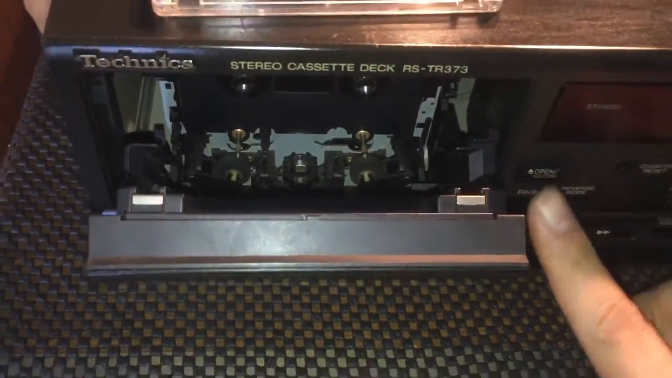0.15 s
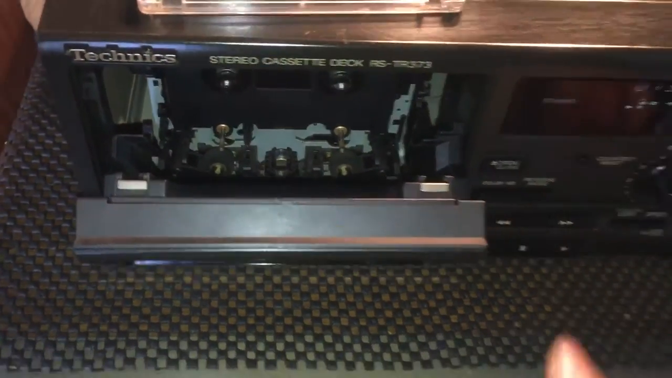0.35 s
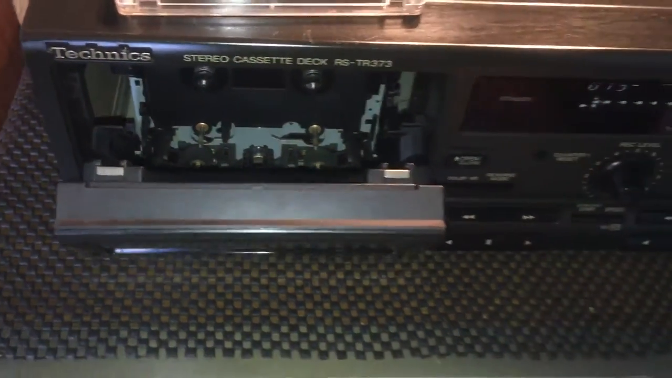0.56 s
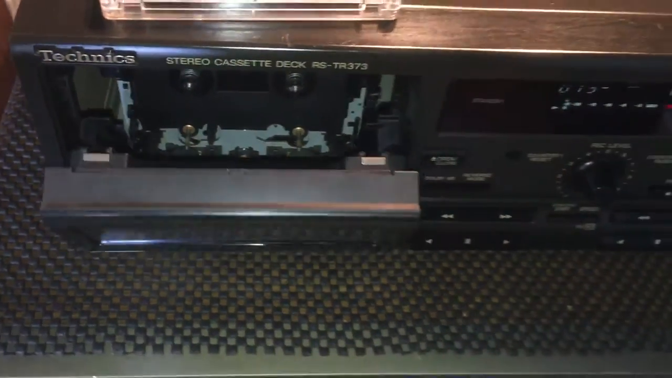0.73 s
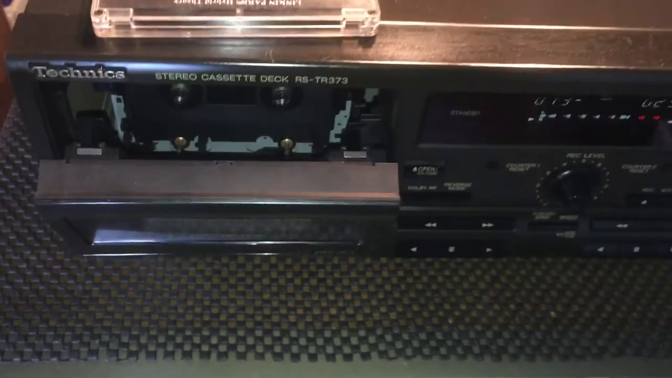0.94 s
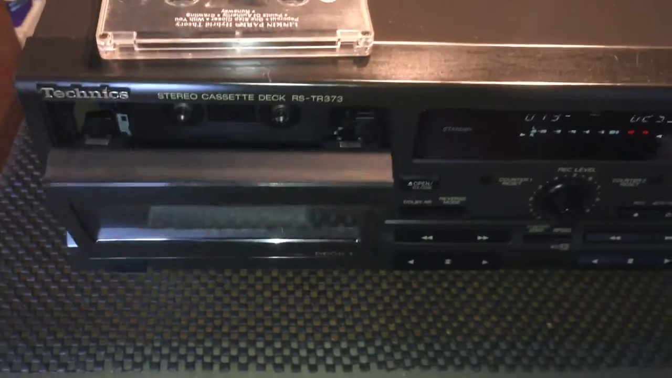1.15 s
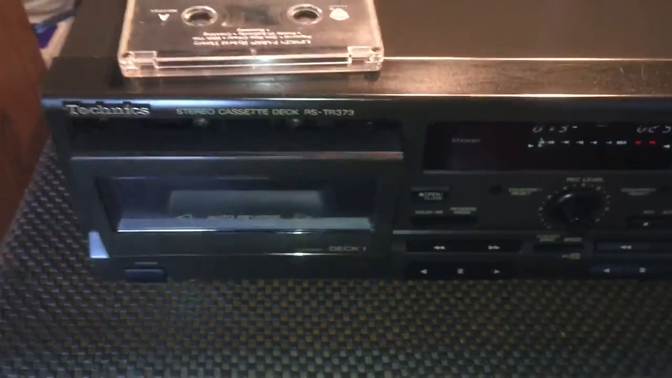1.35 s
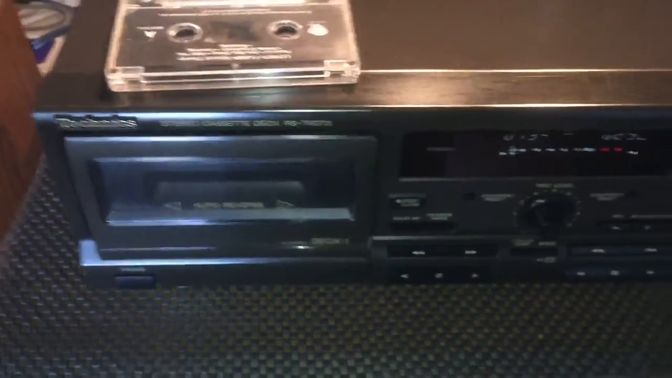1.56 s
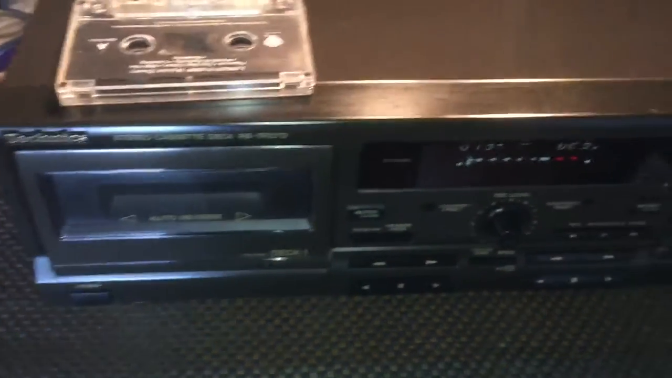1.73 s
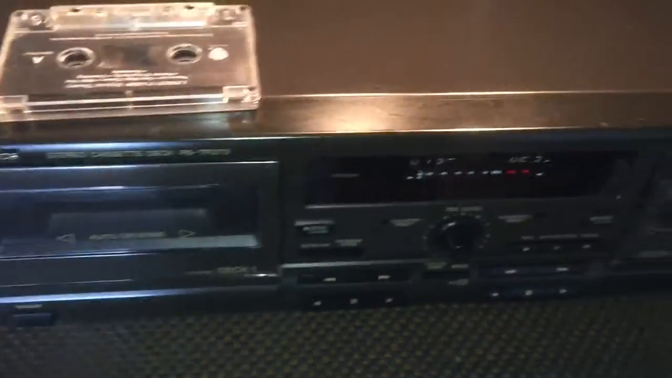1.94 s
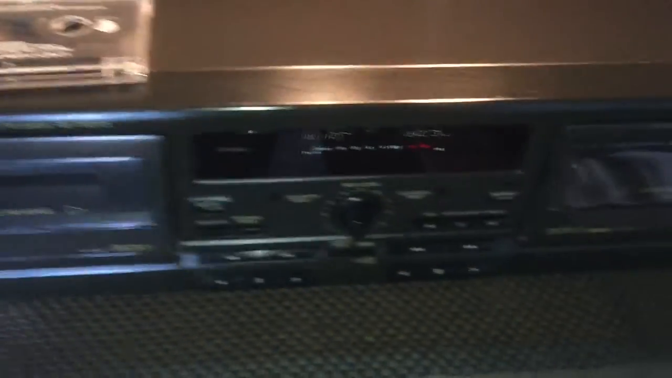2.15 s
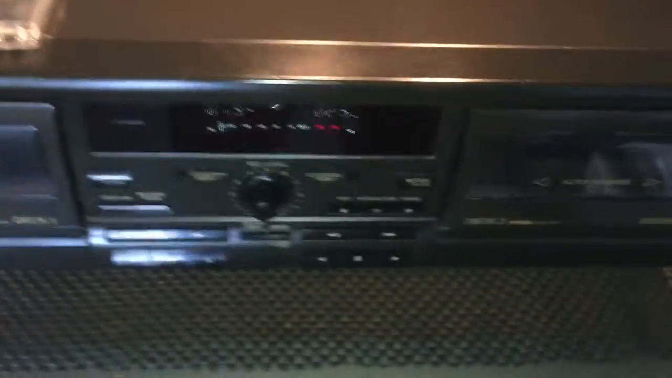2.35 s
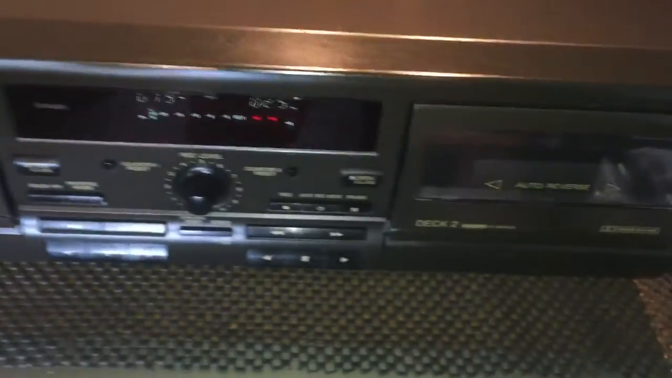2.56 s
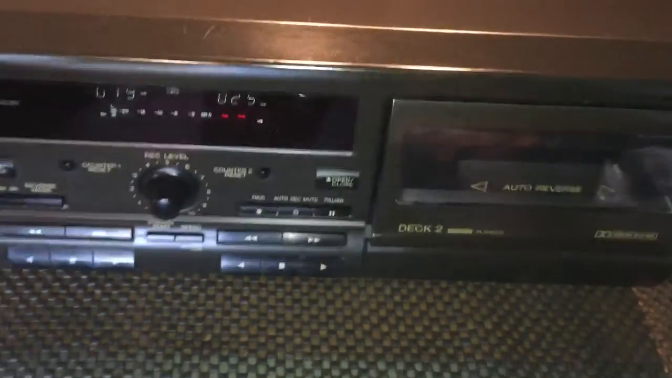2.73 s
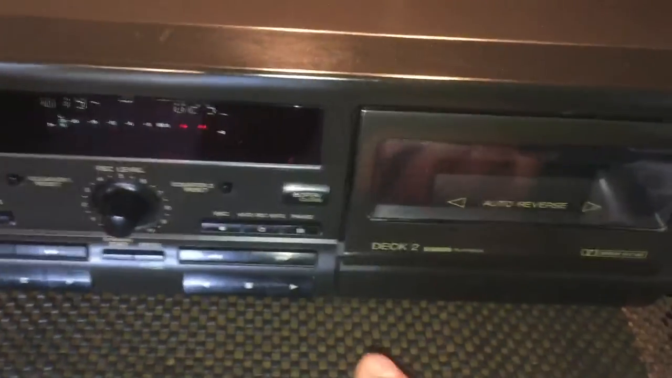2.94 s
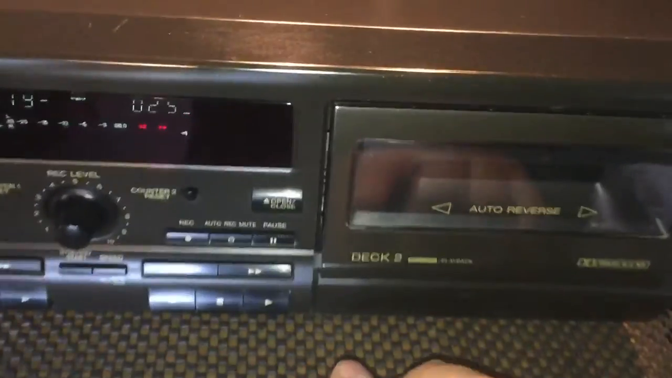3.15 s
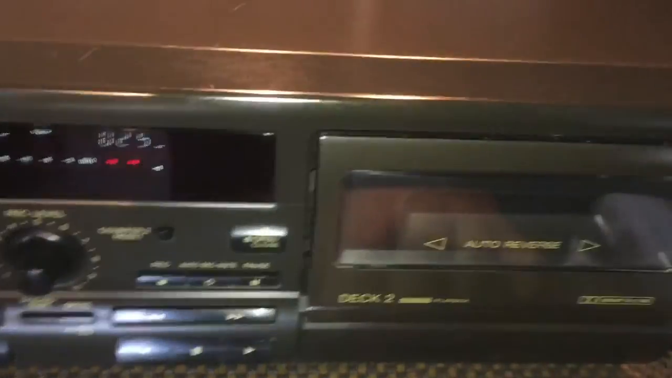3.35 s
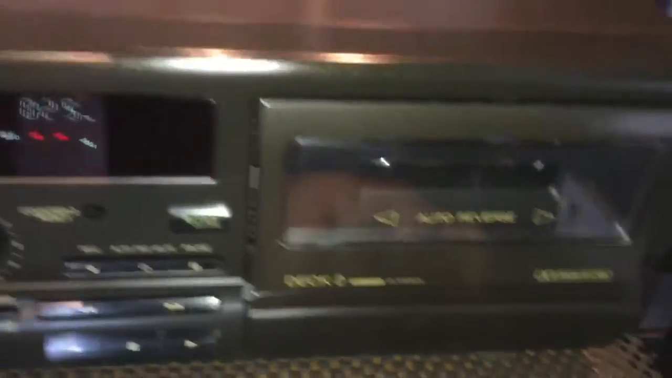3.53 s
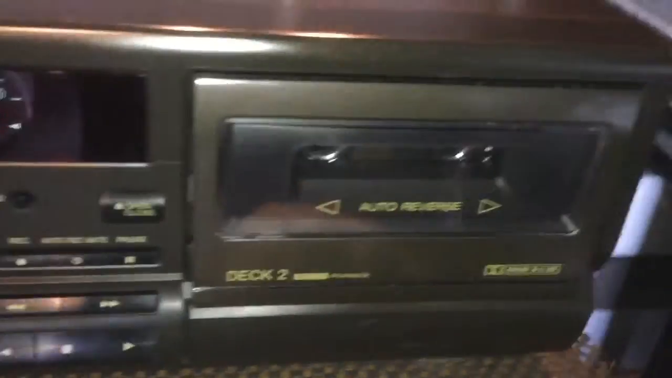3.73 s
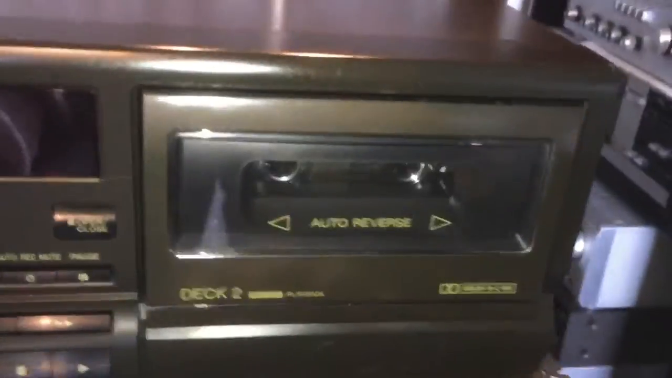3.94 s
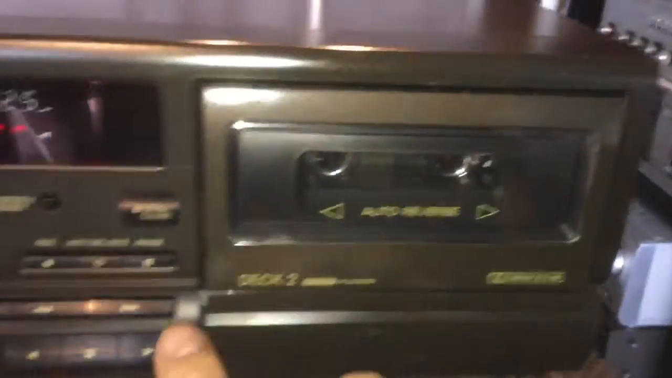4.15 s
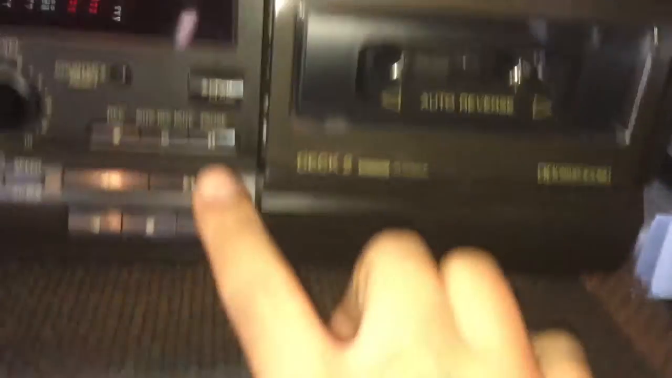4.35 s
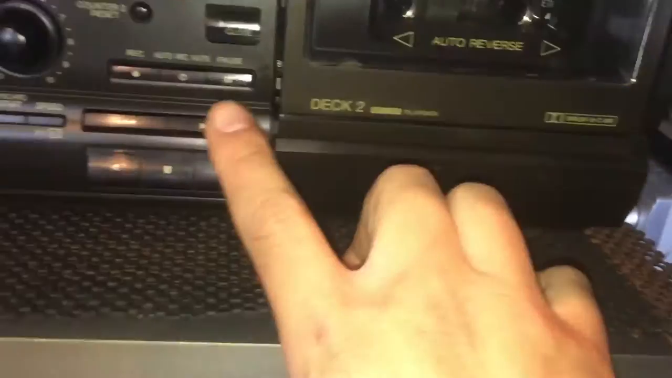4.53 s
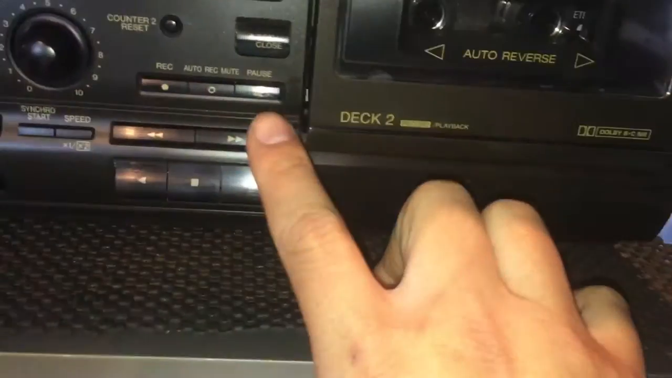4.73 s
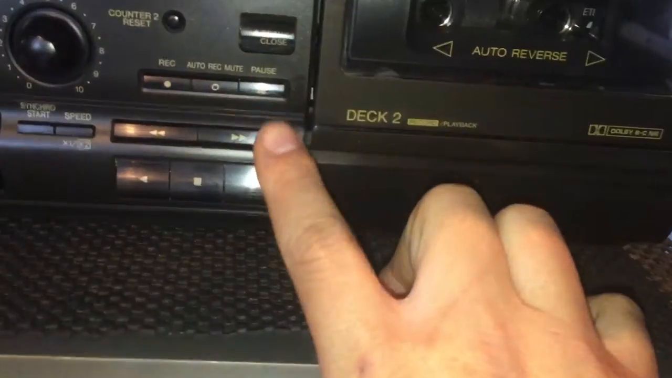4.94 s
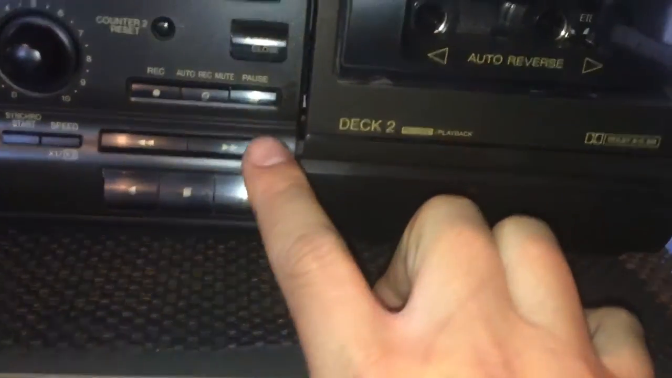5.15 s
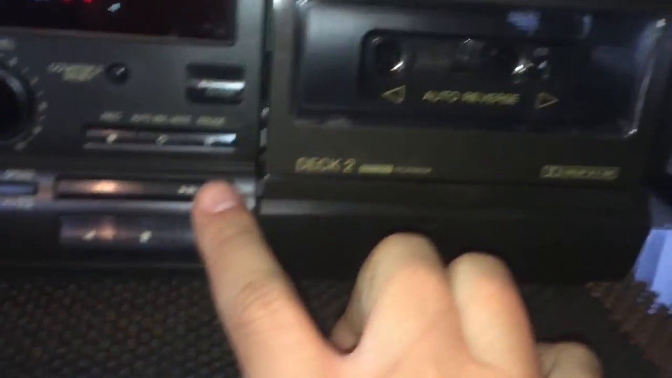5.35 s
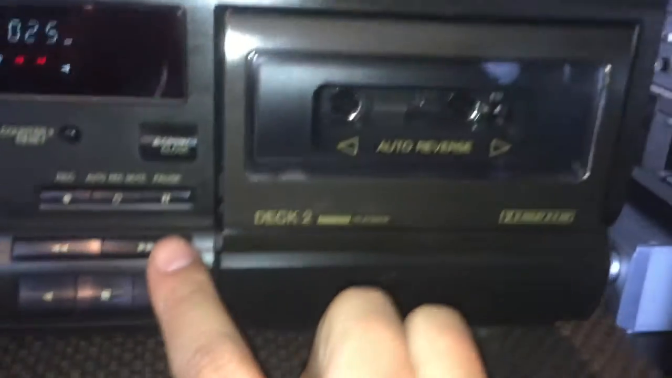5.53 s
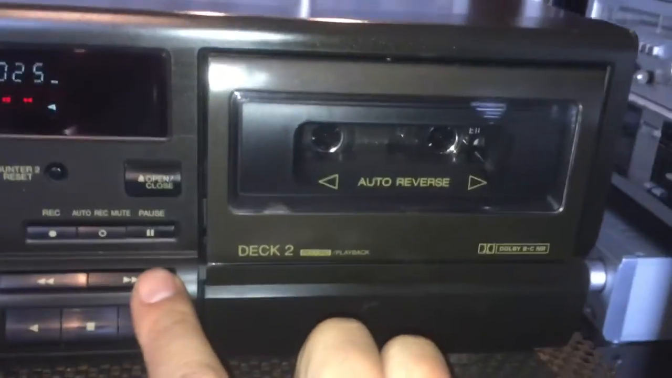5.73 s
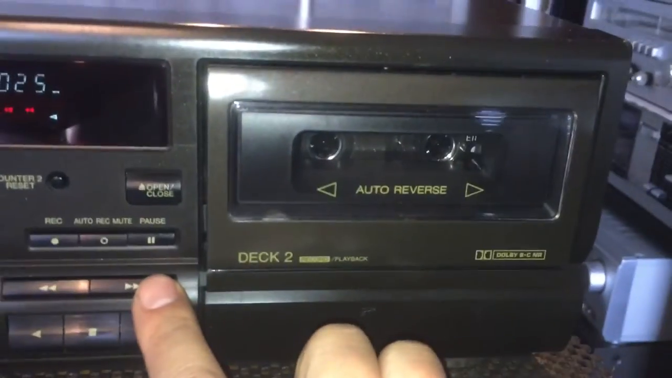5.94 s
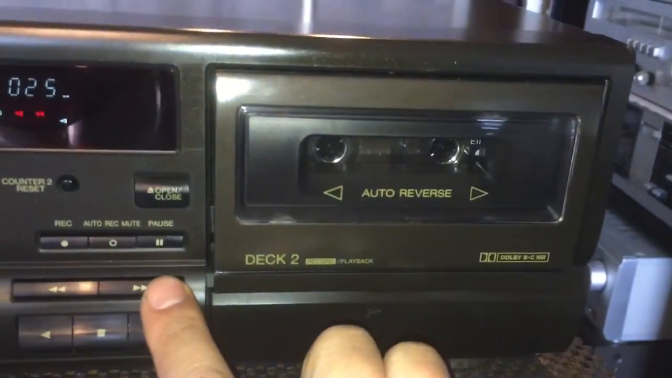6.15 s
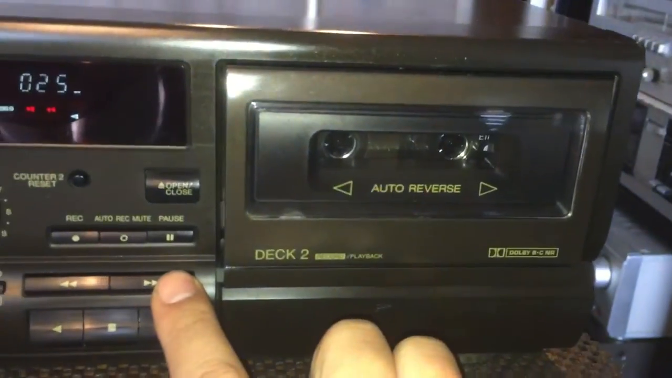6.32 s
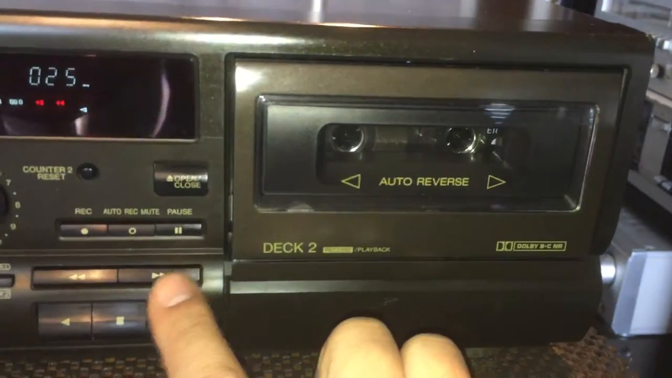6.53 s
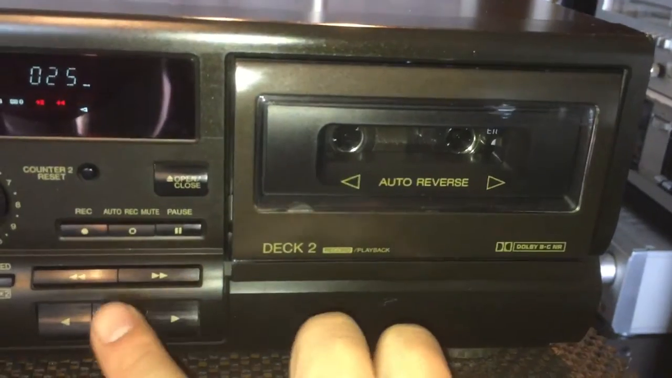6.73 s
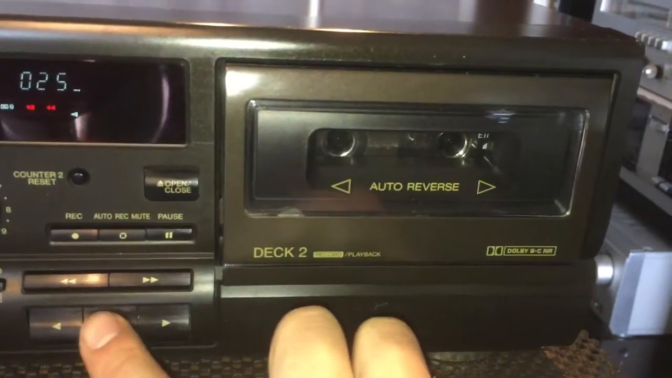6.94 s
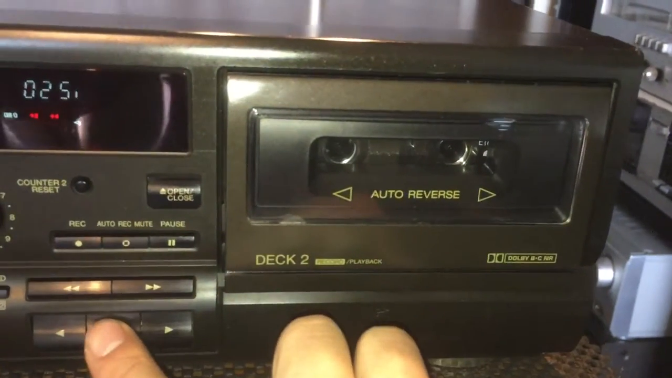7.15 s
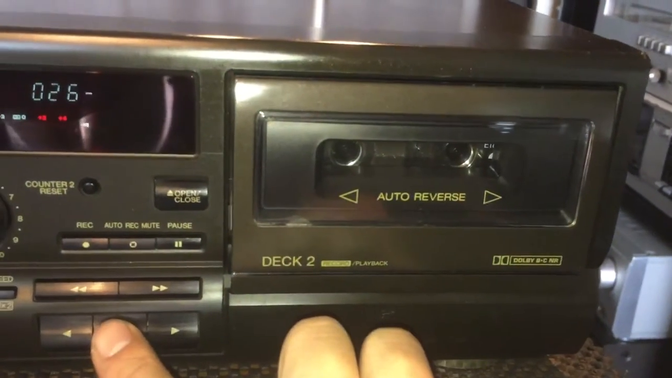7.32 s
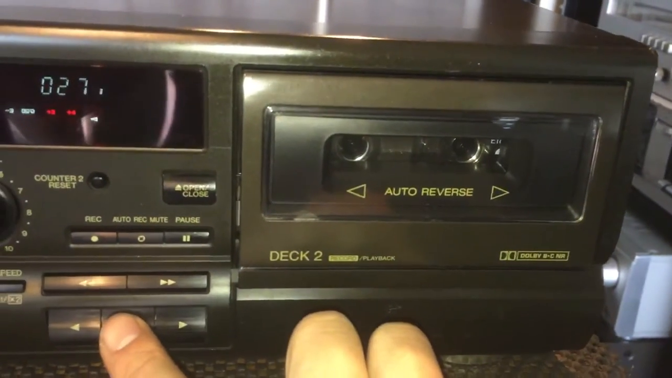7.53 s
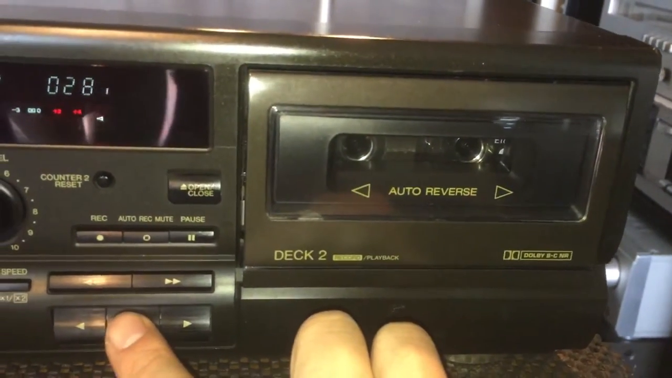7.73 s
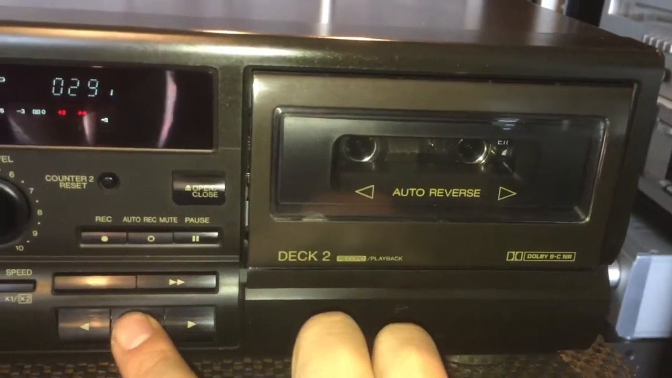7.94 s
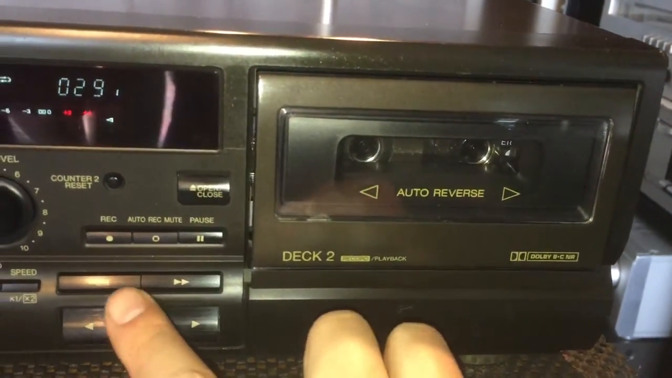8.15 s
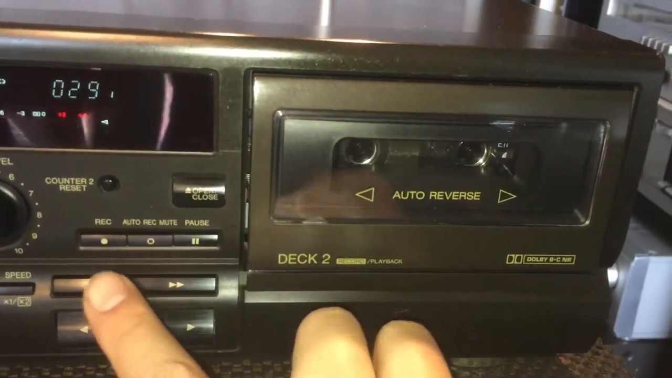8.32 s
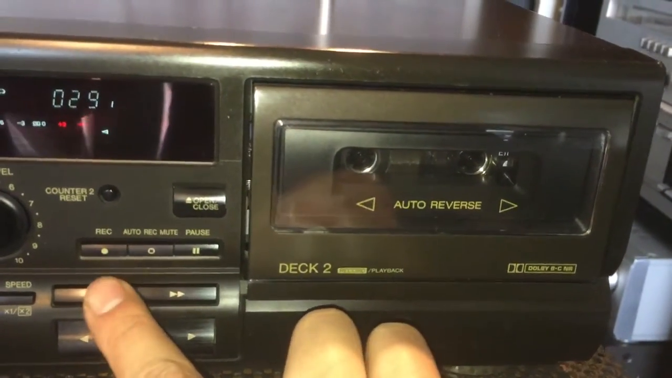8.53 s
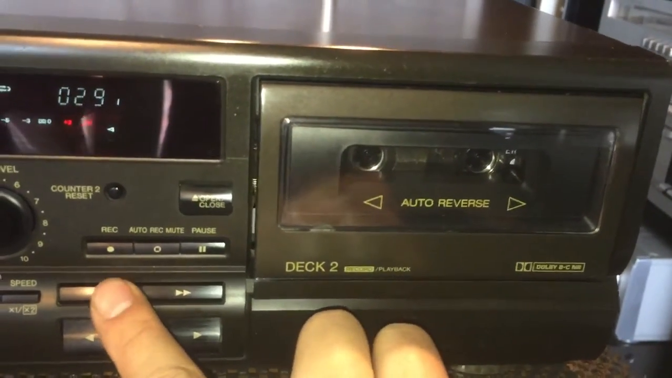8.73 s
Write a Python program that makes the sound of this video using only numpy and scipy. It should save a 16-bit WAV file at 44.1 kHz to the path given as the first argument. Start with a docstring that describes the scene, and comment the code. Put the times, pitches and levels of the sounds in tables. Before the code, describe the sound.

In a quiet room, close to a cassette deck, a key clicks and a small motor faintly whirrs and hisses for under two seconds as the door shuts. Soft scuffs, dull handling bumps and light taps follow. Then a rapid cluster of loud plastic clacks starts empty reel gears, which rattle unevenly for about a second before stopping with another row of clacks and a few final ones.

```python
"""Double cassette deck, door and reels

A double cassette deck stands on a table in a quiet room. A small motor draws the left door shut with a
wavering tone, gear whirr and hiss; someone shifts over to the right well and lightly taps keys.
A cam engages the transport in a row of clacks (noise cracks, ringing modes, a case boom), then empty reel
gears rattle round in bursts of filtered noise and stop. Scuffs, squeaks, bumps, room air and rumble lie around."""
import sys
import numpy as np
from scipy import signal
from scipy.fft import rfft, irfft, next_fast_len
from scipy.io import wavfile
from scipy.ndimage import map_coordinates

SR = 44100
rng = np.random.default_rng(int(sys.argv[2]) if len(sys.argv) > 2 else 0)


def bounce(signal):
    """Save signal as a 16-bit WAV file at the path given by the first command-line argument."""
    frames = np.transpose(np.atleast_2d(signal))
    limited = np.clip(frames, -1, 1)
    pcm = np.round(limited * 32767).astype(np.int16)
    wavfile.write(sys.argv[1], SR, pcm)


N = 391608
T = np.arange(N) / SR

# Blows of keys, latches and cam steps. Each row: start in seconds, strength in dB, then treble, top,
# case boom and chassis ring in dB re strength, pitch of the modes nearest the blow in Hz, rise in seconds.
BLOWS = [(0.032,-23,-7,-19,-24,-5.5,1560,0.0019), (.165,-35,-5.5,-22,-7,-9,1960,0.0023),
         (.249,-30,-15,-32,-32,-32,2090,.0025), (0.34,-32,-27,-24,-33,-15,1400,.0027),
         (.382,-33,-22,-25,-22,-12,1900,0.0024), (.545,-33.5,-30,-22,-27,-24,1740,0.0042),
         (0.559,-33.5,-5,-17,-22,0.5,2600,0.002), (1.673,-25,-24,-40,-8.5,-4.5,697,0.0053),
         (1.743,-33,-33,-12,-10,-10,9420,0.0015), (1.79,-46.5,2.5,3,7.5,-8,6590,0.0029),
         (2.282,-44,-1,-31,-28,-6,4250,0.0012), (2.645,-39.5,-32,-24,-2,-8.5,1850,0.0051),
         (5.73,-36.5,-10,-19,-30,-2.5,1720,0.0024), (6.293,-22,-26.5,-31,-22.5,-6,1550,0.0028),
         (6.459,-7,-6.5,-3,-22,-6,2330,0.006), (6.52,-13.5,-8.5,-7,-21,-6.5,1640,0.0035),
         (6.609,-15.5,-21,-34,-16,-11,1510,0.0064), (6.658,-36,-13,-25,2.5,0,759,0.003),
         (6.671,-44,0,1,3,8,7100,0.0016), (6.683,-25,-2,0,-18,-13,6210,0.0021),
         (6.737,-9.5,-8.5,-3,-28,-6.5,1430,0.0046), (6.77,-19,-11.5,-22,-21,-6,1530,.0017),
         (6.806,-18,-21,-35,-9,-7,764,0.0032), (6.842,-4.5,-15.5,-16,-18.5,-7,1523,0.0029),
         (6.913,-11.5,-18.5,-19.5,-12,-4.5,1240,.0021), (6.959,-10.5,-17.5,-15.5,-13.5,-10,1890,0.0014),
         (6.99,-46,-2,-9,12,-5,1150,.0044), (7.007,-54.5,11.5,5,0,2,721,0.0023),
         (7.941,-21,-15,-41,-36,-8,1360,0.004), (7.993,-11,-7.5,-6,-44,-5,1514,0.0034),
         (8.01,-11.5,-6.5,-13,-32.5,-4.5,2140,0.0075), (8.027,-12,-11.5,-17,-24,-6,2080,0.0036),
         (8.073,-3,-23,-21,-25,-11.5,2050,0.0038), (8.109,-33,-26,-10,2,6.5,820,0.0022),
         (8.136,-21,-24,-13,-9.5,-10,9400,0.0028), (8.144,-23,-17.5,-15,-5,-10,2100,0.0054),
         (8.566,-40.5,-17,-20.5,-20.5,-18,1760,0.013), (8.588,-17.5,-24.5,-21.5,-22.5,-11.5,1800,0.0023),
         (8.755,-7.5,-7,-6.5,-22,-10.5,1730,0.0086), (8.817,-10.5,-13.5,-14,-20,-6,6600,0.0031)]
# Colour of plastic and metal parts cracking together. Each row: frequency in Hz, density in dB per Hz.
CRACK_COLOUR = [(240, -14.5), (400, -3), (598, -45.5), (801, 1.5), (1060, -6), (1460, -5), (2430, -0.5),
                (2800, -11), (4800, -10.5), (5780, -5.5), (7750, -10), (14100, -15), (16000, -16)]
# Resonances of the gear train. Each row: frequency in Hz, width in Hz, level in dB.
GEAR_TRAIN = [(903, 48, 4.5), (1175.5, 33, 10), (1437, 260, 4.5), (2010, 37, 9), (2362, 41, 7),
              (2660, 17, 3.5), (2925, 64, -2.5)]
SPLIT_HZ, TOP_HZ = 3200, 8500     # where treble and top begin


def amp(db):
    """Turn decibels into an amplitude factor."""
    return 10 ** (np.asarray(db) / 20)


def rms_one(x):
    """Scale a signal to rms 1."""
    return x / np.sqrt(np.mean(x ** 2) + 1e-20)


def in_time(rows):
    """Columns of a curve at every sample, and a gate that fades at either end of the curve."""
    s, *columns = np.transpose(rows)
    gate = np.interp(T, [s[0] - 0.015, s[0], s[-1], s[-1] + 0.041], [0, 1, 1, 0])
    return gate, [np.interp(T, s, column) for column in columns]


def coloured(spectrum, low_hz=10, high_hz=20000):
    """Steady noise with a spectrum, kept between two soft edges; rms 1."""
    hz = np.fft.rfftfreq(N, 1 / SR) + 1     # the offset keeps the logarithm finite
    at, level_db = np.transpose(spectrum)
    gain = amp(np.interp(np.log(hz), np.log(at), level_db, left=-90, right=-90))
    gain = gain / np.sqrt((1 + (low_hz / hz) ** 8) * (1 + (hz / high_hz) ** 8))
    return rms_one(irfft(rfft(rng.standard_normal(N)) * gain, N))


def drift(rate_hz):
    """Smoothed chance: noise through a double low-pass; rms 1."""
    r = np.exp(-2 * np.pi * rate_hz / SR)
    noise = rng.standard_normal(N + SR)
    return rms_one(signal.lfilter([1], [1, -2 * r, r * r], noise)[SR:])     # drops the filter's run-in


def ring(x, hz, t60):
    """A decaying mode: a unit click sets a sine of height about 1 ringing."""
    r, w = amp(-60 / (t60 * SR)), 2 * np.pi * hz / SR
    return signal.lfilter([0, np.sin(w)], [1, -2 * r * np.cos(w), r * r], x + 1e-18)


def resonate(x, peaks):
    """Parallel resonances of (Hz, width in Hz, dB), alternating in sign; rms 1."""
    out = 0
    for k, (hz, width, level_db) in enumerate(peaks):
        r = np.exp(-np.pi * width / SR)
        poles = [1, -2 * r * np.cos(2 * np.pi * hz / SR), r * r]
        out = out + (-1) ** k * amp(level_db) * signal.lfilter([1 - r * r, 0, r * r - 1], poles, x)
    return rms_one(out)


def bursts(times, levels_db, rises, lengths, falls):
    """Envelopes that rise, hold and then fall with a time constant; all times in seconds."""
    out = np.zeros(N)
    for s, level_db, rise, length, fall in np.broadcast(times, levels_db, rises, lengths, falls):
        i = round(s * SR)
        t = T[:min(N - i, int((rise + length + 8 * fall) * SR))]
        falling = np.exp(-np.maximum(t - rise - length, 0) / fall)
        out[i:i + len(t)] += amp(level_db) * np.minimum(t / rise, 1) * falling
    return out


def wavering(hz, width_hz, rough):
    """A steady sine plus a narrow band of noise around it: a tone made by uneven contact; rms 1."""
    turn = 2 * np.pi * np.cumsum(hz * np.ones(N)) / SR
    in_step = (1 + rough * drift(width_hz)) * np.sin(turn)
    return rms_one(in_step + rough * drift(width_hz) * np.cos(turn))


def clacks():
    """Each clack is a short rattle of contacts: a broad crack, ringing chassis modes and a case boom."""
    # Modes of the chassis. Each row: frequency in Hz, relative level in dB, T60 in seconds.
    chassis_modes = [(733, -5, 0.092), (690, -25.5, 0.063), (900, -12, 0.034), (1207, -11.5, 0.078),
                     (1392, -19.5, 0.027), (1496, -5.5, 0.039), (1614, 4, 0.017), (1780, -34, 0.026),
                     (2033, -4.5, 0.031), (2136, -11, 0.064), (2570, -9.5, 0.044), (2650, -15, 0.016),
                     (3360, -17.5, 0.077), (4000, -13, 0.022), (5960, -8.5, 0.018), (6200, -24, 0.018),
                     (6670, 1, 0.014), (7340, -8.5, .02), (9060, 2, 0.014)]
    # Modes of the hollow case. Each row: frequency in Hz, relative level in dB, T60 in seconds.
    case_modes = [(260, -3.5, 0.15), (274.4, 3.5, 0.069), (237, -11, .08), (220, -18, 0.027),
                  (334, -8.5, .06)]
    s, strength_db, treble_db, top_db, boom_db, ring_db, near_hz, rise = np.transpose(BLOWS)
    rattle_s = 0.0011

    middle = bursts(s, strength_db - 10.5, rise, rattle_s, 0.012) * coloured(CRACK_COLOUR, high_hz=SPLIT_HZ)
    treble = bursts(s, strength_db + treble_db, rise, rattle_s, 0.0065)
    treble = treble * coloured(CRACK_COLOUR, SPLIT_HZ, TOP_HZ)
    top = bursts(s, strength_db + top_db, rise, rattle_s, 0.0031) * coloured(CRACK_COLOUR, low_hz=TOP_HZ)
    tick = bursts(s + rise, strength_db + top_db - 2.5, 0.00057, 0, 0.0008)     # sharp, at full contact
    tick = tick * coloured(CRACK_COLOUR, low_hz=TOP_HZ)
    touches = amp(3.26 * drift(490))     # separate touches within a rattle
    high_pass = signal.butter(2, 450, "high", fs=SR, output="sos")
    crack = signal.sosfilt(high_pass, touches * (middle + treble + top + tick))

    chassis = 0
    for hz, db, t60 in chassis_modes:     # modes far from where the blow lands are struck more weakly
        distance_octaves = abs(np.log2(hz / near_hz))
        strike = bursts(s, strength_db + ring_db - 10.4 * distance_octaves, rise, rattle_s, 0.0084)
        chassis = chassis + amp(db - 25.5) * ring(strike * rng.standard_normal(N), hz, t60)

    push = np.zeros(N)     # the case gets one shove, just after the contact
    push[np.round((s + rise) * SR).astype(int)] = amp(strength_db + boom_db) * rng.choice([-1, 1], len(s))
    boom = sum(amp(db - 11.5) * ring(push, hz, t60) for hz, db, t60 in case_modes)
    boom = signal.sosfilt(signal.butter(2, [170, 420], "band", fs=SR, output="sos"), boom)
    return amp(-7) * crack + chassis + boom


def cam():
    """Sliders rub on after each clack: a slower swell of unsteady treble friction noise."""
    s, strength_db, treble_db = np.transpose(BLOWS)[:3]
    rub = bursts(s, strength_db + treble_db - 27.5, 0.015, 0, 0.03)
    return rub * amp(2.1 * drift(80)) * coloured(CRACK_COLOUR, low_hz=SPLIT_HZ)


def motor(run, tone_db, hiss_db, hiss_db_per_s, whirr, hiss):
    """Fluttering commutator tone and its octave, gear whirr and bearing hiss, all under one level."""
    gate, (hz, level_db, octave_db) = in_time(run)
    tone = amp(tone_db - drift(20)) * wavering(hz, 33, 1.0)     # flutters by 1 dB rms
    octave = amp(octave_db) * wavering(2 * hz, 23, 1.0)
    hiss = amp(hiss_db + hiss_db_per_s * (T - run[0][0])) * hiss
    return gate * amp(level_db) * (tone + octave + whirr + hiss)


def winding():
    """Unloaded gears knock, drag on after each knock and shake the reel table, while the motor turns."""
    # Knocks of the loose reel gears. Each row: start in seconds, relative strength in dB,
    # length of the drag that follows in seconds.
    gear_knocks = [(7.096, -28.5, .011), (7.1366, -60, 0.0031), (7.1737, -29, 0.015), (7.1873, -21.5, .005),
                   (7.22, -23, 0.039), (7.2515, -22.5, 0.0088), (7.2883, -25, 0.012), (7.2995, -27, 0.037),
                   (7.328, -16.5, .012), (7.369, -21.5, 0.042), (7.408, -23, .016), (7.4212, -12, 0.013),
                   (7.453, -23, 0.061), (7.498, -20, .014), (7.5322, -18.5, 0.023), (7.5793, -24, 0.054),
                   (7.631, -15, .01), (7.653, -28, 0.0031), (7.6951, -24.5, 0.048), (7.7412, -24, 0.029),
                   (7.7617, -32, .012), (7.796, -26.5, 0.022), (7.8263, -26, 0.015), (7.842, -17, 0.017),
                   (7.869, -24, 0.007), (7.924, -15.5, 0.025), (7.9584, -17, .0088)]
    # The reel motor's run. Each row: time in seconds, commutator rate in Hz, level in dB,
    # octave in dB re level.
    reel_run = [(7.03, 745, -73, 13), (7.06, 760, -66.5, -13), (7.2, 779, -57, -8), (7.35, 869, -55, -2.5),
                (7.55, 897.4, -56.5, -5), (7.99, 889, -54.5, -18)]
    # Resonances of the reel table. Each row: frequency in Hz, width in Hz, level in dB.
    reel_table = [(3582, 26, 2), (3910, 34, -7), (4585, 52, -0.5), (5296, 83, 2.5), (5990, 100, 2.5),
                  (6520, 170, -2.5), (7310, 170, -0.5), (8570, 230, -4), (9450, 280, -3.5),
                  (11700, 200, -7.5), (12900, 200, -2), (13700, 250, -8), (14400, 390, -4),
                  (14750, 280, -3.5)]
    # Colour of the turning reels. Each row: frequency in Hz, density in dB per Hz.
    reel_colour = [(88, -44), (150, 1), (271, 9.5), (425, 1.5), (630, -16), (881, 6), (1090, -11),
                   (1160, -11.5), (1410, 5.5), (3160, -22), (3630, -10.5), (5930, -13.5), (10500, -16.5),
                   (14400, -14), (16500, -22)]
    s, knock_db, drag_s = np.transpose(gear_knocks)
    drag_db = 6 + np.interp(s, *np.transpose(reel_run)[[0, 2]])     # follows the motor level

    knock = amp(-21.5) * bursts(s, knock_db, 0.00041, 0.0032, 0.0028)
    contact = knock + bursts(s, drag_db, 0.00082, drag_s, 0.0029)
    teeth = rng.standard_normal(N) * amp(4 * drift(220))     # tiny tooth contacts
    broad = coloured(reel_colour, low_hz=2400) * amp(2.6 * drift(300))
    level = np.sqrt(np.mean(contact ** 2))
    ringing = level * resonate(contact * teeth, reel_table)     # rings on a little after each contact
    shaken = amp(-8.5) * level * resonate(contact * teeth, GEAR_TRAIN)     # contacts shake the gears too

    whirr = resonate(rng.standard_normal(N), GEAR_TRAIN) + amp(-1) * coloured(reel_colour, high_hz=3000)
    whirr = whirr * amp(2.9 * drift(47))
    turning = motor(reel_run, -4.5, -2, -3, whirr, broad)
    return turning + amp(-5.5) * contact * broad + amp(1) * ringing + shaken


def door():
    """The door motor with a singing drive, whose pitch partly follows the motor speed."""
    # The door motor's run. Each row: time in seconds, commutator rate in Hz, level in dB,
    # octave in dB re level.
    door_run = [(.1, 880, -74, 8), (.18, 887, -59.5, -10), (.36, 903, -61, -5), (.44, 903, -59.5, 0),
                (.68, 877, -61.5, 4.5), (.95, 849, -63, 1.5), (1.02, 848, -61.5, -4.5),
                (1.35, 836, -62.5, -9), (1.7, 843, -60, -21), (1.85, 872, -68.5, -14)]
    # Drive resonances early in the door's travel. Each row: frequency in Hz, width in Hz, level in dB.
    early_peaks = [(8250, 160, -4.5), (8900, 200, -15), (10300, 200, -2.5), (11360, 220, -1),
                   (12860, 250, 5.5), (13400, 250, -5), (13900, 200, -13)]
    # The same as the door nears the deck. Each row: frequency in Hz, width in Hz, level in dB.
    late_peaks = [(5580, 100, 2), (8930, 100, 1), (10200, 120, -4), (11600, 150, -3), (12500, 160, -5),
                  (12500, 380, 5)]
    # Colour of the bearing hiss. Each row: frequency in Hz, density in dB per Hz.
    hiss_colour = [(2350, -35), (4000, 19.5), (4390, 6), (4820, 1), (5410, 4.5), (7530, -8), (8260, 0),
                   (9550, 0), (10300, -5), (10900, -20), (13000, 1), (14200, 0), (16000, -14)]
    # Colour of the gear whirr. Each row: frequency in Hz, density in dB per Hz.
    whirr_colour = [(88, -32), (150, -16), (231, -7.5), (291, 2.5), (540, -21.5), (858, -8.5), (986, -21),
                    (1360, -34), (1750, -9.5), (1910, -12.5), (2490, -12.5), (3190, -25), (6000, -31),
                    (7800, -58), (13200, -120)]
    sing_at_hz, sing_follows = 872, 0.49     # motor rate at the listed pitch; exponent of following

    late = np.interp(T, [0.71, 1], [0, 1])     # one set of resonances gives way to the other
    early_sing = resonate(rng.standard_normal(N), early_peaks)
    late_sing = amp(-2.5 + 1.7 * drift(6.5)) * resonate(rng.standard_normal(N), late_peaks)
    sing = np.sqrt(1 - late) * early_sing + np.sqrt(late) * late_sing
    rate_hz = in_time(door_run)[1][0]
    read_at = np.cumsum((rate_hz / sing_at_hz) ** sing_follows)     # reading slower lowers the pitch
    sing = map_coordinates(sing, [read_at], order=3, mode="wrap")

    hiss = amp(-4.5) * coloured(hiss_colour, low_hz=6100) + sing * amp(0.5 + 1.5 * drift(50))
    whirr = coloured(whirr_colour) * amp(2.5 * drift(27))
    whirr = whirr + amp(-5.5) * resonate(rng.standard_normal(N), GEAR_TRAIN)
    # the hiss sinks by 8 dB per second as the door covers the well
    return motor(door_run, -1, 4, -8, whirr, hiss)


def hums():
    """The case and its panels hum: one uneven shaking, heard at the pitch of whichever part hums."""
    # Hums of case and panels. Each row: start in seconds, level in dB, pitch in Hz,
    # rise, hold and fall in seconds, roughness as a ratio.
    panel_hums = [(0.156,-58,335,0.07,.2,.3,.8), (0.188,-62,678,0.018,.03,0.016,.4),
                  (0.262,-57.5,683,.01,0.18,0.016,0.35), (0.805,-67,313,0.15,0.52,0.046,0.37),
                  (1.412,-49.5,286.3,.03,.15,.02,0.22), (1.677,-58.5,283,0.023,.02,0.054,0.65),
                  (6.476,-40,271,0.0069,0.043,0.047,0.94), (6.67,-45.5,269,0.017,0.036,0.057,0.67),
                  (6.743,-26.5,268,0.014,0.0044,0.027,0.39), (6.849,-31,274,0.011,.01,0.065,0.54),
                  (6.947,-36.5,264,0.018,0.036,.015,0.58), (7.075,-48,271,0.027,.03,0.036,0.54),
                  (7.204,-52.5,272.2,0.035,0.1,0.093,0.7), (8.02,-29,263,0.011,0.0035,0.022,0.4),
                  (8.075,-38.5,270,0.018,0.048,0.026,0.88), (8.765,-35.5,271.2,0.014,.004,0.029,0.54)]
    width_hz = 32
    shake = drift(width_hz) + 1j * drift(width_hz)
    out = 0
    for s, db, hz, rise, hold, fall, rough in panel_hums:
        tone = np.real((1 + rough * shake) * np.exp(2j * np.pi * hz * T))
        tone = tone / np.sqrt(0.5 + rough ** 2)     # about rms 1
        out = out + bursts(s, db, rise, hold, fall) * tone
    return out


def taps():
    """A finger lands lightly on a key: a soft noise touch sets the key cap ringing briefly."""
    # Touches of the finger. Each row: start in seconds, relative strength in dB, rise in seconds.
    touches = [(5.025, -59.5, 0.026), (5.197, -54, 0.0025)]
    # Modes of the key cap. Each row: frequency in Hz, relative level in dB, T60 in seconds.
    key_modes = [(1486, 2, 0.059), (1940, -4.5, 0.031), (2585, -13.5, .03), (3100, -13, 0.0243),
                 (4000, -16.5, 0.016)]
    s, db, rise = np.transpose(touches)
    touch = bursts(s, db - 17.5, rise, 0, 0.0098)     # weakly coupled to the modes
    return sum(amp(level_db) * ring(touch * rng.standard_normal(N), hz, t60) for hz, level_db, t60 in key_modes)


def scuffs():
    """Something drags over a surface: grainy friction noise in three bands, with a ringing scrape."""
    # Drags over a surface. Each row: start in seconds, level in dB, rise, hold and fall in seconds,
    # scrape near 2 kHz and treble, both in dB re level.
    drags = [(1.6, -55, 0.046, 0.025, 0.048, -1, -2), (2.35, -72, .05, .2, .03, -6, -0.5),
             (3.18, -66, .03, 0.051, 0.015, -1, -4.5), (3.285, -56, 0.028, 0.087, 0.0082, 4, 0.5),
             (3.56, -60.5, 0.025, 0.035, 0.025, -5.5, -5.5), (3.614, -54.5, 0.051, 0.051, 0.018, -0.5, 4),
             (6.33, -68.5, .03, 0.036, .02, -1, -11.5), (8.62, -67, .03, 0.033, 0.038, 0.5, -8)]
    # Colour of the friction. Each row: frequency in Hz, density in dB per Hz.
    friction_colour = [(150, -33), (250, -6), (308, -20), (367, -1), (468, -4), (576, -3), (831, -10.5),
                       (1180, -3), (2050, -12), (3650, -25), (9010, -33.5), (14200, -45), (16000, -38)]
    grain = amp(0.91 * drift(220) + 1.2 * drift(33))
    low = coloured(friction_colour, high_hz=1290)
    scrape = coloured(friction_colour, 2070, SPLIT_HZ)
    high = coloured(friction_colour, low_hz=SPLIT_HZ)
    # the dragged thing rings
    scrape = scrape + amp(3.5) * resonate(rng.standard_normal(N), [(1810, 120, 6.0), (2400, 650, 0.38)])
    s, level_db, rise, hold, fall, scrape_db, treble_db = np.transpose(drags)
    parts = (low, level_db), (scrape, level_db + scrape_db), (high, level_db + treble_db)
    return grain * sum(noise * bursts(s, db, rise, hold, fall) for noise, db in parts)


def squeaks():
    """A few thin whistles made by uneven contact, each rising as it goes."""
    # Thin whistles. Each row: start in seconds, level in dB, starting pitch in Hz, hold in seconds.
    whistles = [(3.456, -74, 4270, .04), (3.852, -67, 4220, 0.058), (3.952, -77, 4300, 0.124)]
    rise_hz_per_s, edge_s = 1800, 0.017
    out = 0
    for s, db, hz, hold in whistles:
        whistle = wavering(hz + rise_hz_per_s * (T - s), 45, 0.77)
        out = out + bursts(s, db, edge_s, hold, edge_s) * whistle
    return out


def room(x):
    """Room sound from eight feedback delays, duller on every round."""
    t60_s, wall_cut_hz = 0.28, 2870     # T60 at low frequencies; low-pass of one round
    size = next_fast_len(N + SR)
    w = 2 * np.pi * np.fft.rfftfreq(size, 1 / SR)
    dull = 1 / (1 + 1j * w / (2 * np.pi * wall_cut_hz))
    delays_s = rng.uniform(0.008, 0.03, 8)
    loops = [amp(-60 * d / t60_s) * dull * np.exp(-1j * w * d) for d in delays_s]
    return irfft(rfft(x, size) * sum(g / (1 - g) for g in loops), size)[:N]


def bumps():
    """Dull bumps through the floor or grip: each rings a few low, quickly decaying cycles."""
    # Dull bumps. Each row: start in seconds, level in dB, pitch in Hz.
    dull_bumps = [(1.54, -39.5, 144), (1.649, -47, 195), (3.068, -61, 108), (3.501, -42, 187),
                  (3.534, -42, 151), (3.735, -42, 144), (3.778, -47, 188), (3.842, -39.5, 126),
                  (4.454, -48, 155), (5.254, -38.5, 168), (5.383, -41.5, 142), (5.449, -42.5, 176),
                  (5.694, -39, 113), (6.017, -48.5, 153)]
    out = np.zeros(N)
    t = T[:SR // 5]
    for s, level_db, hz in dull_bumps:
        out[round(s * SR):][:len(t)] += amp(level_db) * np.sin(2 * np.pi * hz * t) * np.exp(-t / 0.0095)
    return out


def room_air():
    """Quiet room air: steady coloured noise that wavers very slightly."""
    # Colour of the air. Each row: frequency in Hz, density in dB per Hz.
    air_colour = [(53, -34), (90, -3.5), (125, -19), (166, -7.5), (235, -20), (363, -18), (472, -27),
                  (669, -24), (908, -24), (1130, -22), (1710, -23), (2480, -27.5), (9360, -35.5),
                  (15100, -41.5), (16500, -58.5)]
    return amp(-64) * coloured(air_colour) * amp(0.23 * drift(6))


def building_rumble():
    """Building rumble: low noise with a narrow resonance at 67 Hz, swelling unevenly."""
    # Colour of the rumble. Each row: frequency in Hz, density in dB per Hz.
    rumble_colour = [(15, -65.5), (25, -37.5), (30, -21.5), (40, -19.5), (54, 8), (71, 3.5), (81, 6),
                     (91, -4.5), (112, -9.5), (130, -6.5), (170, -47.5), (290, -120)]
    resonance = resonate(rng.standard_normal(N), [(67, 6.5, 0)])
    rumble = amp(-57.5) * (coloured(rumble_colour) + amp(2) * resonance)
    return rumble * amp(1.4 * drift(1.4))


def scene():
    """Deck and movements, their room sound, and the steady background."""
    near = clacks() + cam() + winding() + door() + hums() + taps() + scuffs() + squeaks()
    return (near + amp(-17) * room(near) + bumps() + room_air() + building_rumble())[None]


def record(dry):
    """Cut the top steeply, by 70 dB from 16850 Hz upward."""
    return signal.sosfilt(signal.cheby2(14, 70, 16850, fs=SR, output="sos"), dry)


dry = scene()
out = record(dry)
bounce(out)
```